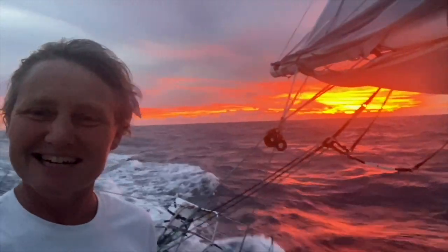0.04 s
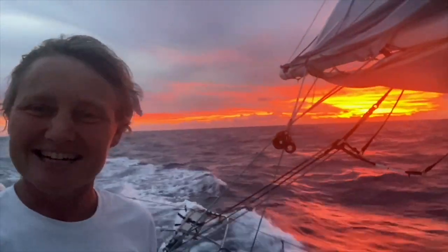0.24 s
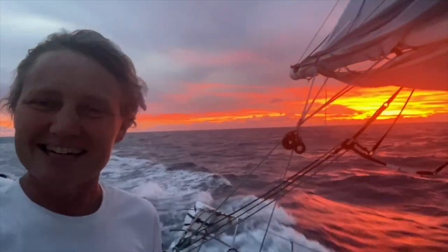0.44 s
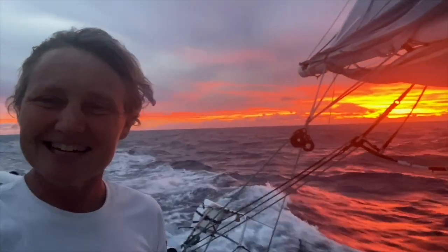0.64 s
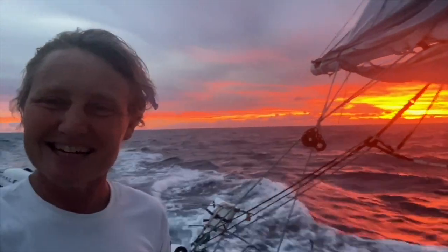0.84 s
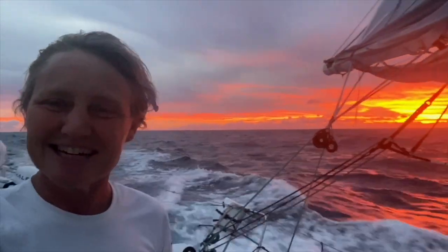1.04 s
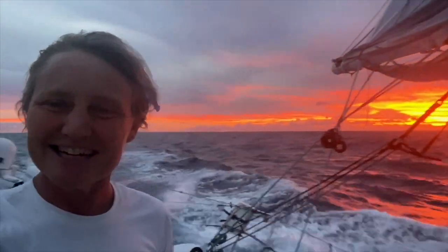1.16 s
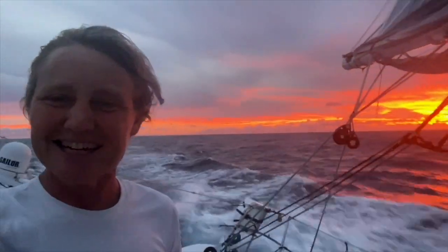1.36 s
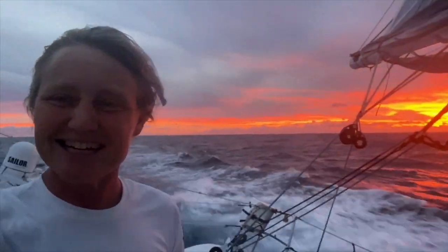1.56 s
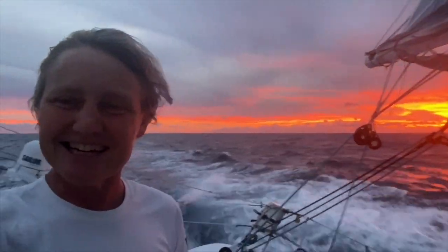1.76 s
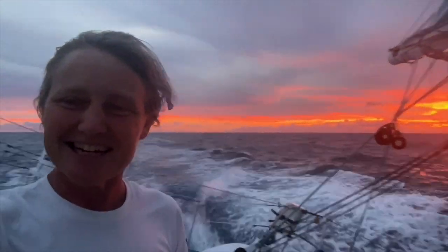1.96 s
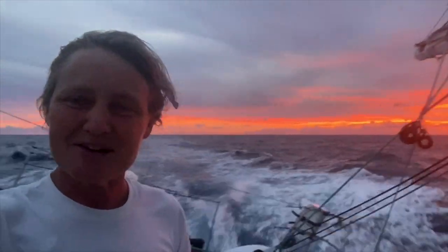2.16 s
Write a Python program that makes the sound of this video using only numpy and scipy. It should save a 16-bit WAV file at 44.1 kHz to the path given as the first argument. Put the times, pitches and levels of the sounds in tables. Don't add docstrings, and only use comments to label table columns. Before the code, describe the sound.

Wind roars and buffets a stereo microphone in an open sailboat cockpit. It starts somewhat lower, thumps heavily around 0.3-0.6 s, eases near 0.7-0.9 s, then gusts again at 1.1-1.3 s. Sharper snaps cluster near 1.7, 1.9 and 2.1 s. Underneath, wide water hiss, foam on the left and fine spray continue, with a faint wavering low hum, clearest around 0.7-1.2 s.

```python
import sys
import numpy as np
from scipy import signal
from scipy.io import wavfile
from scipy.ndimage import uniform_filter1d

SR = 44100
rng = np.random.default_rng(int(sys.argv[2]) if len(sys.argv) > 2 else 0)


def unload_wav(signal):
    wavfile.write(
        sys.argv[1],
        SR,
        np.round(np.clip(np.atleast_2d(signal).T, -1, 1) * 32767).astype(np.int16),
    )


def linear_from_db(decibels):
    return 10 ** (np.asarray(decibels, float) / 20)


N = 96667


def evened(x):
    return x / np.sqrt(np.mean(x ** 2) + 1e-20)


def read(points, hz):
    f, value = np.transpose(points)
    return np.interp(np.log(hz + 1), np.log(f + 1), value)


def follow(rows, t, order=1):
    rows = np.array(rows)
    return np.interp(t, rows[:, 0], rows[:, order])


def drift(t, lo_hz, hi_hz):
    out = np.zeros(len(t))
    for f in np.geomspace(lo_hz, hi_hz, 24):
        out += np.sin(2 * np.pi * (f * t + rng.random())) / np.sqrt(f)
    return evened(out)


GLIDE = 0.25


def eddy(hz, turns, phase):
    u = np.arange(-2048, 2049) / SR * hz
    swirl = np.cos(2 * np.pi * (u - GLIDE * u ** 2 / (4 * turns) + phase))
    return np.exp(-.5 * (u / turns) ** 2) * swirl


# start in seconds, strength in dB,
# sharpness in dB per octave added above TILT_HZ.
GUST_CURVE = [(0.0, -17, 2), (0.21, -16.5, -2.5), (0.32, -16.5, 0), (0.39, -24, 2.5), (0.43, -18.5, -0.5),
              (0.49, -10, -2.5), (0.54, -21, 1), (0.6, -17.5, 1.5), (0.79, -20, 0.5), (1.12, -10, -0.6),
              (1.28, -18, 0.94), (1.5, -15, 0.9), (1.71, -12, 1.06), (1.78, -21.5, 2), (1.85, -13.5, 0.6),
              (1.93, -14.5, 2.5), (1.98, -19.5, 2.5), (2.19, -14, 0.5)]
# frequency in Hz, level in dB per Hz.
WIND_SPECTRUM = [(12, -38), (20, -10), (70, -1), (265, -10), (318, -12), (528, -15), (775, -20.5),
                 (929, -24), (2500, -40.5), (3250, -61), (5500, -120)]
TILT_HZ, WIND_DB = 146, -1.5
EDDIES_PER_TURN, EDDY_SPREAD_DB, EDDY_TURNS = 2.4, 2.0, 0.71
LAG_TURNS = 0.55


def wind():
    t = np.arange(N) / SR
    gusty, steady = np.zeros(N), np.zeros(N)
    lumps_db = 1.22 * drift(t, 5, 50) + follow(GUST_CURVE, t)
    sharpness = follow(GUST_CURVE, t, order=2)
    for hz in np.geomspace(28, 2200, 30):
        excess = np.minimum(rng.exponential(1, N), 5)
        size = linear_from_db(EDDY_SPREAD_DB * excess) * rng.choice([-1., 1.], N)
        size *= rng.random(N) < EDDIES_PER_TURN * hz / (6 * SR)
        layer = evened(signal.oaconvolve(size, eddy(hz, EDDY_TURNS, rng.random()), "same"))
        layer *= linear_from_db(read(WIND_SPECTRUM, hz)) * np.sqrt(hz)
        steady += layer
        swell_db = np.interp(t - LAG_TURNS / hz, t, lumps_db)
        gusty += layer * linear_from_db(swell_db + sharpness * max(np.log2(hz / TILT_HZ), 0))
    return gusty / np.std(steady) * linear_from_db(WIND_DB)


# time in seconds, level in dB.
HUM_LEVEL = [(0, -21), (.07, -21.5), (.16, -31.5), (.3, -27.5), (.48, -28.5), (.64, -30), (.74, -21.5),
             (.85, -25.5), (.95, -20.5), (1.05, -21), (1.15, -19.5), (1.22, -33.5), (1.36, -34), (1.5, -21),
             (1.6, -34), (1.7, -27.5), (1.8, -41), (2.19, -33)]
HUM_HZ, HUM_WAVER_HZ, HUM_THROB_DB = 265, 2.6, 3.2


def keel():
    t = np.arange(N) / SR
    turns = np.cumsum(HUM_HZ + HUM_WAVER_HZ * drift(t, 0.484, 9.37)) / SR
    level_db = follow(HUM_LEVEL, t) + HUM_THROB_DB * drift(t, 9.5, 45)
    return np.sqrt(2) * linear_from_db(level_db) * np.sin(2 * np.pi * turns)


SWELL_FADES_HZ = 5060


def hiss(colour, patchy_db, flicker_db):
    frames = N // 128 + 6
    hz = np.fft.rfftfreq(512, 1 / SR)[:, None]
    a, b, c, d, patches, flicker = rng.standard_normal((frames, 257, 6)).T
    patches = evened(uniform_filter1d(uniform_filter1d(patches, 8, 0), 12, 1))
    flicker = evened(uniform_filter1d(uniform_filter1d(flicker, 70, 0), 3, 1))
    unrest_db = (patchy_db * patches + flicker_db * flicker) / (1 + (hz / (2 * SWELL_FADES_HZ)) ** 2)
    shape = linear_from_db(read(colour, hz) + unrest_db)
    return hz, shape * np.array([a + 1j * b, c + 1j * d])


def sounded(fields):
    return evened(signal.istft(fields, nperseg=512, noverlap=384)[1][:, :N])


# time in seconds, foam surge in dB, further foam level in dB, # wash swell in dB.
WAKE_COURSE = [(0, -34, -5.5, 8), (.4, -36, 2.5, 7.5), (.54, -34, -10, 8.5), (.66, -39, 8.5, 10.5),
               (.8, -41, 13.5, 8), (.9, -36, 1, 7), (1.0, -34.5, -4.5, 6), (1.2, -37, 6.5, 5),
               (1.35, -34.5, -4, 8), (1.5, -39.5, 13.5, 2.5), (1.66, -35.5, 6.5, -3), (1.78, -32.5, 3, 2),
               (1.86, -37, 9, 6.5), (1.92, -33, 10.5, 5), (1.98, -33, 3, -0.5), (2.05, -39.5, 15.5, -1),
               (2.19, -38.5, 12.5, 3)]
# frequency in Hz, level in dB per Hz.
WASH_SPECTRUM = [(350, -6), (700, -5.5), (1500, -11.5), (3000, -15.5), (5000, -21.5), (8500, -21.5),
                 (13200, -29), (15500, -27)]
# frequency in Hz, shared part from -1 to 1.
WASH_LIKENESS = [(700, -.2), (1300, .1), (8300, -.1), (9150, -.96), (9600, -.93), (10500, 0), (11100, 1),
                 (12800, 1), (13450, 0), (13750, -1)]
WASH_DB = -27


def wash():
    hz, (a, b) = hiss(WASH_SPECTRUM, patchy_db=1.5, flicker_db=2.0)
    same = np.clip(read(WASH_LIKENESS, hz), -1, 1)
    swell_db = follow(WAKE_COURSE, np.arange(a.shape[1]) * 128 / SR, order=3)
    swell = linear_from_db(swell_db / (1 + (hz / SWELL_FADES_HZ) ** 2))
    mid = np.sqrt((1 + same) / 2) * a * swell
    side = np.sqrt((1 - same) / 2) * b * swell
    return sounded([mid + side, mid - side]) * linear_from_db(WASH_DB)


# frequency in Hz, level in dB per Hz.
FOAM_SPECTRUM = [(500, -10.5), (1200, -2), (2500, -4), (4000, -4.5), (7600, -7), (9000, -17.5),
                 (10300, -25), (11000, -90)]
FOAM_DB, FOAM_FOLLOWS = 2.5, 1.64
FOAM_LAG_S, FOAM_RIGHT_DB = 0.000485, -12.5


def foam():
    t = np.arange(N) / SR
    hz, (a, _) = hiss(FOAM_SPECTRUM, patchy_db=1.0, flicker_db=2.1)
    early = linear_from_db(FOAM_RIGHT_DB) * a * np.exp(2j * np.pi * hz * FOAM_LAG_S)
    surge_db, lift_db = follow(WAKE_COURSE, t), follow(WAKE_COURSE, t, order=2)
    mean_db = surge_db.mean()
    level_db = FOAM_DB + mean_db + FOAM_FOLLOWS * (surge_db - mean_db)
    level_db += 0.57 * (lift_db - lift_db.mean())
    return sounded([a, early]) * linear_from_db(level_db)


SPRAY_DB, DROPS_PER_S, DROP_SPREAD_DB = -43, 460, 2.5


def spray():
    out = np.zeros((2, N))
    for hz in np.geomspace(1100, 4200, 8):
        size = linear_from_db(DROP_SPREAD_DB * np.minimum(rng.exponential(1, (2, N)), 4))
        size *= rng.random((2, N)) < DROPS_PER_S / (8 * SR)
        drop = eddy(hz, 0.56, rng.random())[None, 1848:2249] * 1100 / hz
        out += signal.oaconvolve(size, drop, "same", axes=1)
    swell_db = follow(WAKE_COURSE, np.arange(N) / SR, order=3)
    return linear_from_db(SPRAY_DB + swell_db) * evened(out + 0.096 * out[::-1])


SUCK_SPREAD = .6


def buffets(rows, turns, trim_db):
    out = np.zeros(N + 9000)
    for (s, db, hz), phase in zip(rows, rng.random(len(rows))):
        start = round(s * SR)
        pull = eddy(hz, turns, .5 + SUCK_SPREAD * (phase - .5))
        out[start:][:4097] += linear_from_db(db + trim_db) * pull
    return out[2048:2048 + N]


# time in seconds, peak in dB, pitch in Hz.
THUMP_EDDIES = [(0.009, -10, 129), (0.298, -2.5, 202), (0.309, -2.5, 99), (0.321, -9, 56),
                (0.351, -1.5, 200), (0.376, -10, 79), (0.379, -6.5, 140), (0.402, -7, 158),
                (0.478, -1.5, 128), (0.487, -8, 56), (0.49, -6, 178), (0.5, -1.5, 100), (0.559, -5.9, 198),
                (0.569, -8, 89), (0.578, -4, 200), (0.588, -6, 180), (0.598, -7, 56), (0.612, -5.5, 141),
                (0.655, -2, 101), (0.677, -14, 79), (0.721, -8, 98), (0.845, -9, 131), (0.878, -8, 78.4),
                (0.95, -16, 113), (0.957, -9, 200), (0.967, -4, 178), (0.983, -12, 124), (1.02, -8.5, 101),
                (1.03, -10, 141), (1.042, -21, 178), (1.081, -4.5, 202), (1.088, -10, 63.6),
                (1.093, -21, 200), (1.126, -3.5, 204), (1.133, -3.5, 78.4), (1.14, -19, 202),
                (1.178, -15, 89), (1.182, -17, 200), (1.199, -5, 203), (1.199, -4.5, 112),
                (1.248, -7.5, 80), (1.291, -7, 180), (1.363, -10, 70.4), (1.458, -8, 88), (1.481, -15, 79),
                (1.518, -22, 88), (1.554, -6.5, 204), (1.566, -11.5, 141), (1.569, -3.5, 60.7),
                (1.582, -9, 126), (1.602, -17, 55.5), (1.64, -7, 204), (1.658, -13, 71), (1.698, -6.5, 78),
                (1.842, -3, 114), (1.857, -12, 141), (1.908, -8.5, 128), (1.927, -7, 50.3),
                (1.927, -7.1, 204), (2.166, -7, 175)]
THUMP_TURNS, THUMP_DB = 0.58, -1.06


def thumps():
    return buffets(THUMP_EDDIES, THUMP_TURNS, THUMP_DB)


# time in seconds, peak in dB, pitch in Hz.
SNAP_EDDIES = [(0.021, -10, 484), (0.293, -12.5, 480), (0.297, -3, 354), (0.361, -20, 341),
               (0.373, -6, 298), (0.462, -5.5, 420), (0.469, -4.5, 277), (0.471, -16, 455),
               (0.478, -10, 414), (0.49, -12, 470), (0.554, -13.1, 454), (0.983, -12, 487),
               (1.024, -12, 490), (1.065, -14, 610), (1.084, -8.5, 363), (1.124, -11, 662),
               (1.127, -10.5, 381), (1.14, -10, 420), (1.18, -11, 535), (1.187, -6.5, 324),
               (1.237, -8, 520), (1.286, -11.5, 980), (1.287, -2.5, 505), (1.352, -6.5, 493),
               (1.461, -10.5, 745), (1.462, -11.5, 423), (1.516, -15.5, 540), (1.556, -12.5, 980),
               (1.654, -24, 381), (1.672, -12.5, 990), (1.672, -5, 593), (1.679, -8.5, 500),
               (1.686, -11.5, 840), (1.687, -5, 383), (1.831, -10.5, 531), (1.839, -19, 546),
               (1.863, -14, 520), (1.874, -10.5, 680), (1.881, -14.6, 826), (1.896, -11, 890),
               (1.907, -10, 593), (1.915, -15, 480), (1.921, -8, 750), (1.937, -21, 826),
               (1.946, -6.5, 293), (1.971, -18, 810), (1.973, -12.6, 517), (1.989, -9, 662),
               (2.103, -9.5, 922), (2.105, -13, 663), (2.109, -17, 1029), (2.11, -7, 600),
               (2.119, -10.8, 930), (2.124, -8.5, 710), (2.145, -17, 826), (2.151, -11.5, 476),
               (2.153, -12.2, 306), (2.155, -20, 1029), (2.158, -11, 720), (2.161, -8, 381)]


def snaps():
    return buffets(SNAP_EDDIES, turns=0.77, trim_db=-0.2)


# time in seconds, peak in dB, pitch in Hz.
MORE_THUMP_EDDIES = [(.065, -17, 110), (.12, -15, 65), (.24, -15, 70.4), (.27, -10, 139), (.455, -8, 270),
                     (.53, -12, 60), (.582, -10, 330), (.6, -10, 347), (.69, -15, 60.5), (.77, -16, 91),
                     (.8, -15, 126), (1.052, -9, 60), (1.325, -15, 85), (1.4, -8.5, 140), (1.42, -14, 91),
                     (1.44, -15, 190), (1.52, -15, 110), (1.73, -15, 140), (1.97, -17, 60), (2.05, -12.5, 244),
                     (2.1, -13, 75)]


def more_thumps():
    return buffets(MORE_THUMP_EDDIES, THUMP_TURNS, THUMP_DB)


PORTS_DIFFER_DB, PORTS_SMEAR_S, PORTS_FROM_HZ = 0.5, 0.0095, 1700
PORTS_BASS_DB = -19


def ports(x):
    t = np.arange(1500) / SR
    smear = rng.standard_normal(1500) * np.exp(-t / PORTS_SMEAR_S)
    scrambled = signal.oaconvolve(x, smear / np.linalg.norm(smear))[:N]
    high_pass = signal.butter(1, PORTS_FROM_HZ, "high", fs=SR)
    side = linear_from_db(PORTS_DIFFER_DB) * signal.lfilter(*high_pass, scrambled)
    side += linear_from_db(PORTS_BASS_DB) * scrambled
    return np.array([x + side, x - side])


def scene():
    gusts = wind() + thumps() + snaps()
    water = wash() + foam() + spray()
    return ports(gusts) + keel() + water + more_thumps()


# time in seconds, edge in Hz,
# leak below the edge in dB.
GUARD_COURSE = [
    (0, 506, -11.5),
    (.75, 530, -12),
    (.95, 686, -10),
    (1.15, 760, -37),
    (1.25, 890, -70),
    (2.19, 920, -68),
]
GUARD_SLIPS, SLIP_DB, LEAK_PATCHY_DB = 1.3, -17, 9
TOP_HZ, TOP_OPENS = 15100, .9


def guard(x):
    mid, side = (x[0] + x[1]) / 2, (x[0] - x[1]) / 2
    hz, t, z = signal.stft(side, SR, nperseg=2048)
    hz = hz[:, None]
    slips = rng.standard_normal((len(t), len(hz)))
    slips = evened(uniform_filter1d(uniform_filter1d(slips, 9, 1), 2, 0)).T
    leak_db = follow(GUARD_COURSE, t, order=2) + LEAK_PATCHY_DB * np.clip(slips, -3, .5)
    leak_db = np.maximum(leak_db, np.where(slips > GUARD_SLIPS, SLIP_DB, -99))
    fits = evened(uniform_filter1d(rng.standard_normal((len(t), 2)), 2, 0)).T
    top_hz = TOP_HZ + 150 * np.clip(fits[0], -3, 1) + 900 * (fits[1] > TOP_OPENS)
    z = z * (hz < top_hz) * np.where(hz > follow(GUARD_COURSE, t), 1, linear_from_db(leak_db))
    side = signal.istft(z, SR, nperseg=2048)[1][:N]
    return np.array([mid + side, mid - side])


def roll_off(x):
    return signal.sosfilt(signal.butter(12, 15700, fs=SR, output="sos"), x)


LOW_CUT_HZ, EDGE_HZ, CEILING = 33, 15700, 1.6


def record(dry):
    low_cut = signal.butter(2, LOW_CUT_HZ, "high", fs=SR, output="sos")
    x = guard(signal.sosfiltfilt(low_cut, dry))
    x = CEILING * np.tanh(x / CEILING)
    band_limit = signal.firwin(511, EDGE_HZ, window=("kaiser", 9), fs=SR)
    x = signal.oaconvolve(x, band_limit[None], "same")
    return roll_off(np.clip(x, -1, 1))


dry = scene()
out = record(dry)
unload_wav(out)
```